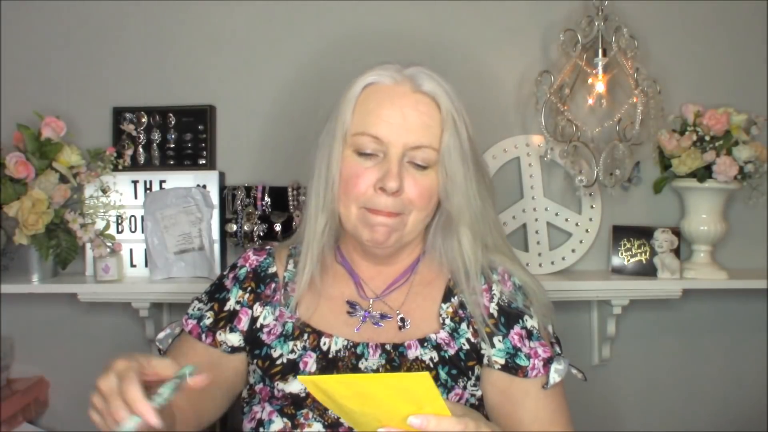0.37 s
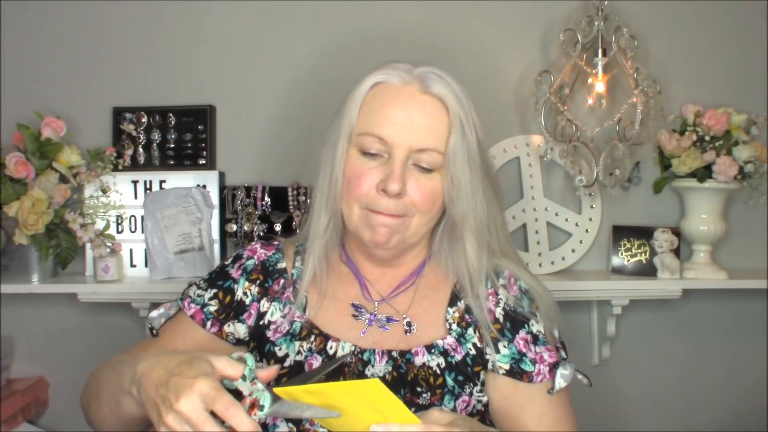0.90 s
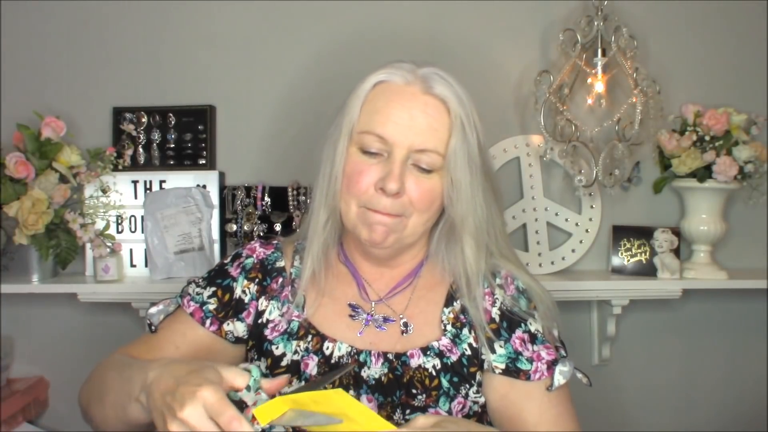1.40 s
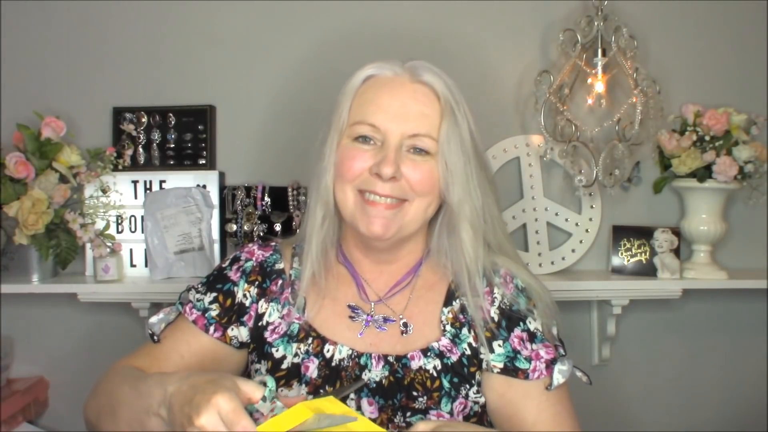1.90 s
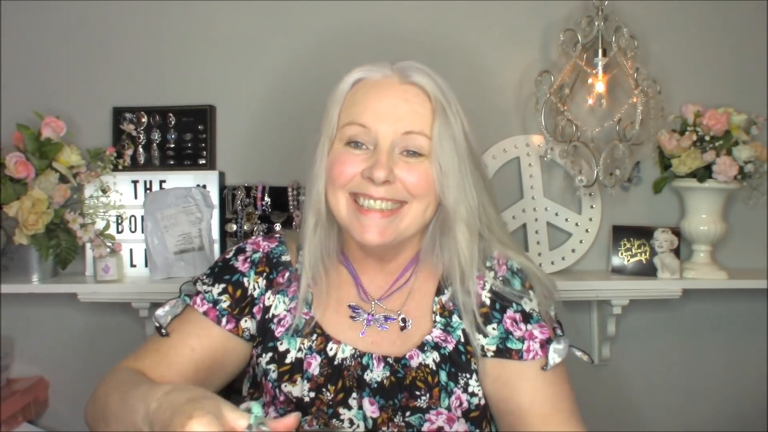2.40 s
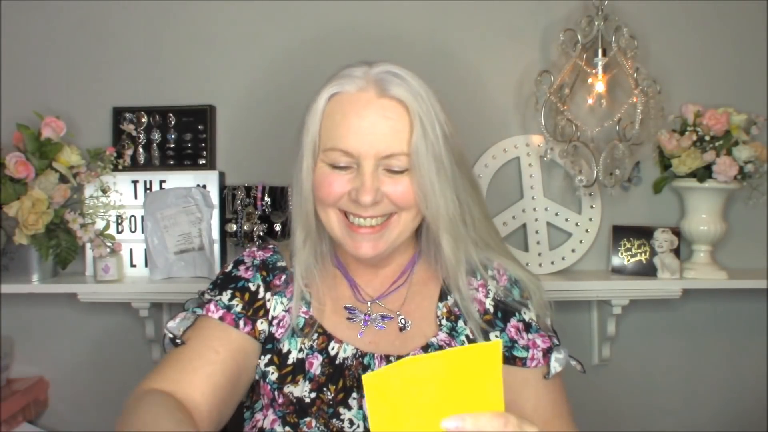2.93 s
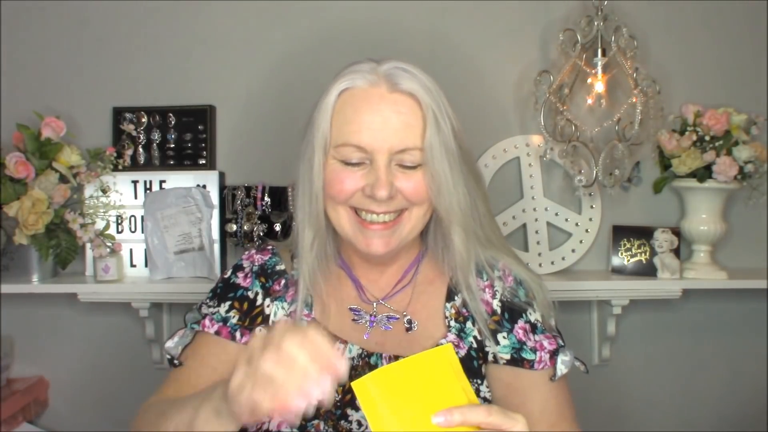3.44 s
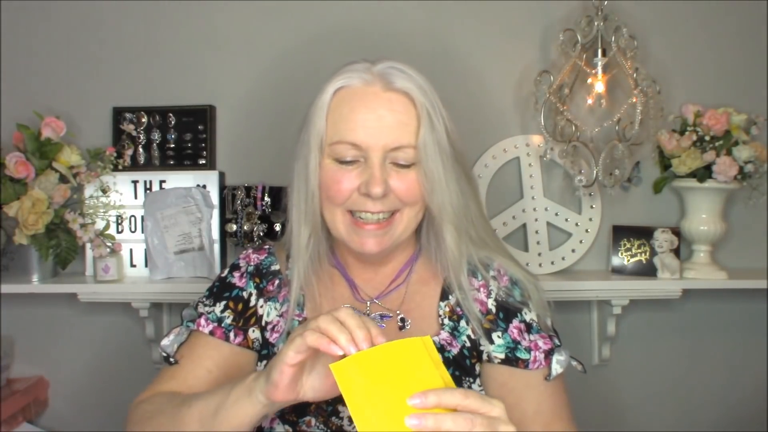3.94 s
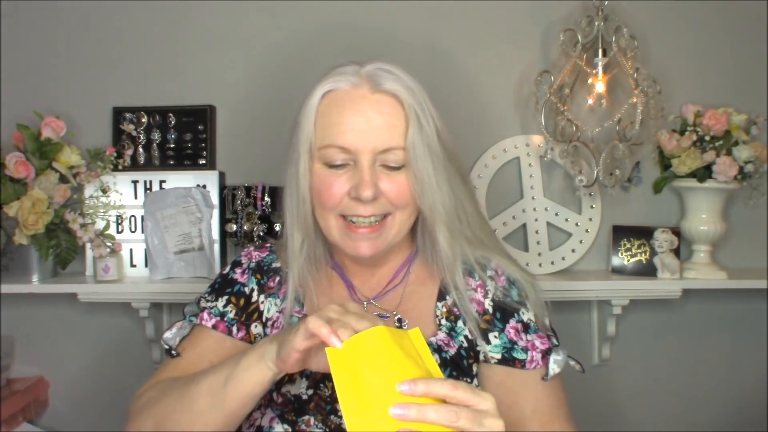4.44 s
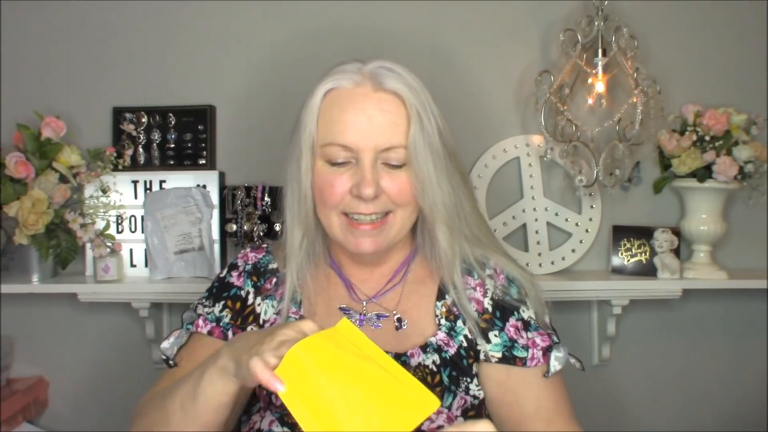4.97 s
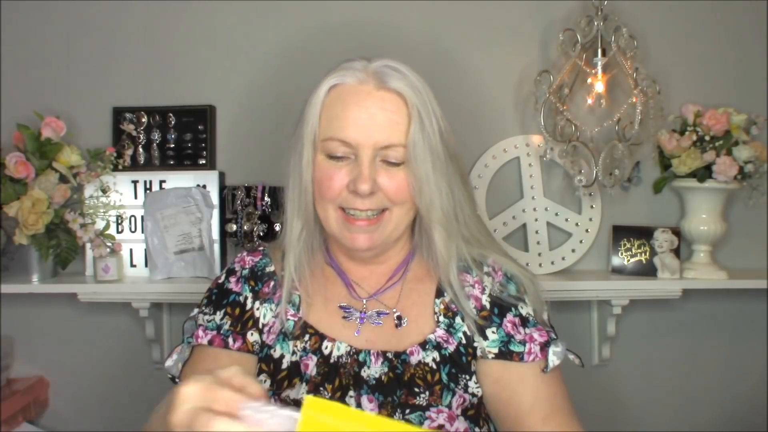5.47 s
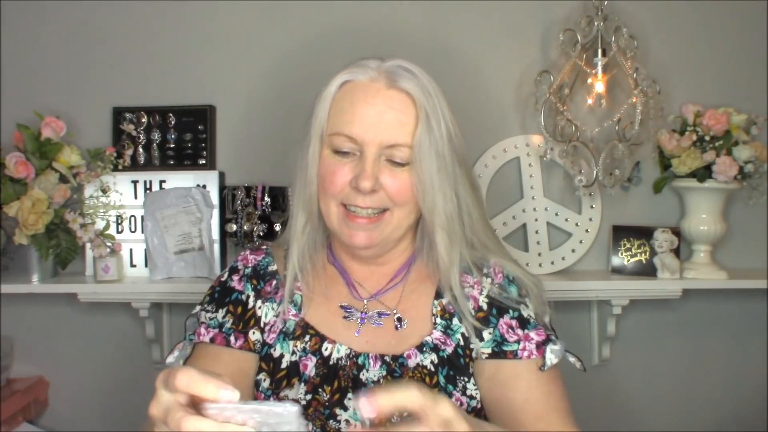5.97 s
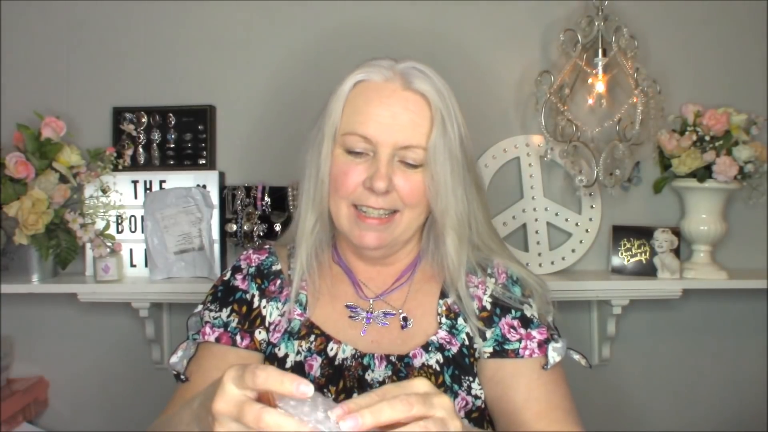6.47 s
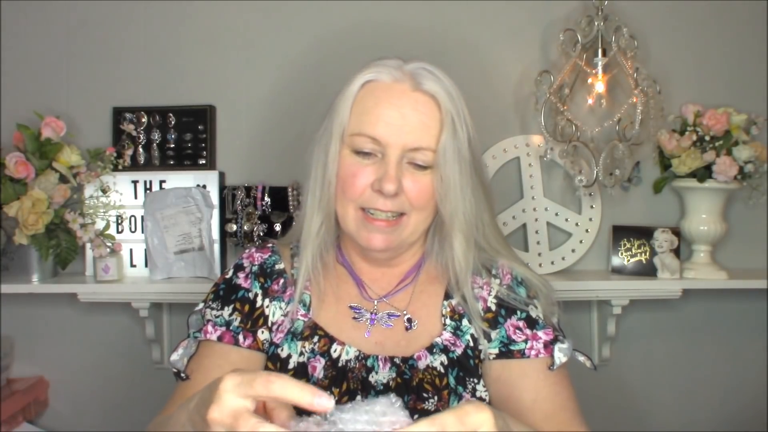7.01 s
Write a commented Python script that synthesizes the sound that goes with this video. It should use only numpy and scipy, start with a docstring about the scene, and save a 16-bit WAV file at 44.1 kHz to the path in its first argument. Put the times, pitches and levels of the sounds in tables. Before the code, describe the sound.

Scissors snip crisply through a padded paper packet, clack down on a table, then fingers rustle paper and draw out crackling plastic wrap.

```python
"""Scissors are picked up, snip four times through a padded paper packet and are laid on a table: grainy
friction and noise-burst blows drive ringing steel. Fingers then open the packet and pull out crinkling
plastic wrap: clumped grains shaped by strokes, with sharp cracks. Soft thuds are decaying low sines.
A small furnished room adds sparse, decaying taps over a low hum of shaped noise; the sound is near-mono."""
import sys
import numpy as np
from scipy import signal
from scipy.io import wavfile
from scipy.ndimage import uniform_filter1d

SR = 44100
rng = np.random.default_rng(int(sys.argv[2]) if len(sys.argv) > 2 else 0)


def gain_from_decibels(decibels):
    """Convert decibel values to linear amplitude factors."""
    exponent = np.asarray(decibels, float) / 20
    return 10 ** exponent


def generate_wav(sig):
    """Save sig (samples, or channels by samples) to the path in sys.argv[1] as 16-bit PCM at SR."""
    pcm = np.round(np.clip(np.atleast_2d(sig).T, -1, 1) * 32767).astype(np.int16)
    wavfile.write(sys.argv[1], SR, pcm)


N = 313992

# Blades sliding and shearing. Each row: peak in s, effort in dB, rise in s, fall in s, brightness in dB per octave.
SHEAR_STROKES = [(0.332, -48.5, 0.0069, 0.043, 7.5), (0.375, -49.5, 0.0013, 0.048, 8.5),
                 (0.595, -50.5, .004, 0.4, 3), (.74, -57.5, 0.29, .08, 0), (.87, -60, 0.032, 0.046, -2),
                 (0.959, -51, 0.0055, 0.15, 1.5), (1.03, -48, .01, 0.25, 3.5),
                 (1.109, -35, 0.0042, 0.077, 2), (1.25, -58.5, 0.11, 0.22, 1.5),
                 (1.365, -41, 0.075, 0.07, 5.5), (1.45, -60.5, 0.0074, .04, 2),
                 (1.515, -33, 0.029, 0.021, 4.5), (1.55, -40.5, 0.026, 0.091, 2.5),
                 (1.594, -44, 0.0064, 0.039, 1.5), (1.674, -54, 0.014, 0.075, 1.5),
                 (1.774, -40.5, 0.015, .1, 4.5), (1.825, -45.5, 0.069, 0.052, 3.5),
                 (1.875, -48, 0.024, 0.13, 2), (1.916, -37.5, 0.011, 0.099, 1.5),
                 (1.98, -49.5, .04, 0.065, 5), (2.164, -39, 0.079, 0.062, 5),
                 (2.246, -33, 0.029, 0.024, 1.5), (2.281, -36.5, 0.025, 0.044, 1)]
# Rustling of packet and wrap, with a soft swell and the scatter as the scissors are laid down.
# Each row: peak in s, effort in dB, rise in s, fall in s, brightness in dB per octave.
RUSTLE_STROKES = [(2.37, -56.5, 0.05, 0.043, 0.5), (2.399, -40, 0.0085, 0.025, 0.5),
                  (2.42, -40, 0.0057, 0.033, -2), (2.531, -47.5, .05, 0.023, 1),
                  (2.575, -52, .015, 0.086, 0), (2.65, -69.5, .05, 0.4, 1.5), (2.9, -59.5, .1, 0.074, 0),
                  (3.0, -57.5, 0.088, .08, -2), (3.144, -48, 0.019, 0.026, 0.5),
                  (3.178, -43, 0.0062, 0.064, -1.5), (3.26, -33.5, .008, 0.031, -3.5),
                  (3.308, -34.5, 0.042, 0.05, -3.5), (3.375, -49.5, .04, 0.038, -3),
                  (3.599, -50, 0.0037, 0.022, -1.5), (3.624, -55, 0.014, 0.061, 1),
                  (3.662, -40, 0.0073, 0.025, -1), (3.718, -43.5, 0.018, 0.021, 0.5),
                  (3.874, -60.5, 0.013, 0.022, 1), (3.94, -58, 0.025, 0.22, 3),
                  (3.988, -41.5, 0.009, 0.019, 4), (4.048, -44.5, 0.014, 0.0069, .5),
                  (4.08, -51, 0.044, 0.22, 1.5), (4.2, -49.5, 0.26, 0.095, 2.5),
                  (4.289, -52.5, .006, 0.74, 1.5), (4.462, -48.5, 0.018, .1, 0),
                  (4.53, -48.5, .05, 0.44, 1.5), (4.744, -52, .01, 0.079, 0.5), (4.89, -45, 0.13, .04, 2.5),
                  (4.95, -56, .05, .05, -1), (5.033, -48.5, 0.013, 0.13, -0.5), (5.138, -49, 0.015, 0.2, 0),
                  (5.28, -52.5, 0.25, .15, -1), (5.459, -37.5, 0.14, 0.13, 0.5),
                  (5.706, -43, 0.056, 0.011, 0.5), (5.757, -44, 0.06, 0.064, -1.5),
                  (5.832, -52.5, 0.0061, 0.11, -4.5), (5.898, -52, 0.083, 0.033, 3.5),
                  (5.984, -56.5, 0.12, 0.135, 2.5), (6.147, -54.5, 0.078, 0.016, 1.5),
                  (6.34, -55.5, 0.44, 0.25, 2), (6.408, -46.5, 0.038, .08, 3),
                  (6.545, -47, 0.093, 0.094, 2), (6.71, -53, 0.28, 0.25, 2),
                  (6.87, -49.5, 0.084, 0.49, 2.5), (7.095, -54, .01, 0.08, 6.5)]
# Blows of the blades. Each row: time in s, level in dB, pitch in Hz, thump in dB re the blow.
SNIP_BLOWS = [(.3313, -32, 5150, -34), (.3793, -39, 6300, -29), (.479, -57.5, 6960, -30),
              (1.036, -32, 2100, -24), (1.0991, -10.5, 4000, -31), (1.1003, -13, 2430, -29),
              (1.281, -39, 2820, -11), (1.3012, -38, 7500, -16), (1.5114, -23.5, 4280, -35),
              (1.5312, -9.5, 4370, -22.5), (1.5425, -24, 4220, -24), (1.5546, -27.5, 4520, -4),
              (1.573, -25.5, 3970, -9), (1.5939, -20.5, 4250, -17), (1.8164, -30.5, 1340, -15),
              (1.9155, -18, 4160, -24), (1.9335, -41, 4210, -5), (1.9602, -20.5, 4220, -35),
              (1.9744, -32, 4490, -19), (1.9881, -34, 3960, -29), (2.15, -35, 4450, -15),
              (2.1648, -24.5, 5400, -10.5), (2.2251, -24, 6430, -9), (2.243, -19, 2110, -21),
              (2.2672, -13, 4160, -10), (2.2736, -11.5, 9300, -13)]
# Scissors meeting the table. Each row: time in s, level in dB, pitch in Hz, thump in dB re the blow.
KNOCK_BLOWS = [(3.123, -45, 447, -26), (3.173, -27.5, 3630, -37), (3.203, -26, 2420, -15.5),
               (3.254, -10.5, 2980, -11), (3.271, -16, 1060, -14), (3.295, -12, 4140, -44),
               (3.302, -19.5, 1090, -48), (3.365, -30, 6190, -22), (3.383, -30.5, 900, -26)]
# Stiff folds cracking. Each row: time in s, level in dB, pitch in Hz, thump in dB re the blow.
CRACK_BLOWS = [(2.394, -27, 678, -26), (2.419, -28.5, 4870, -26), (2.442, -30, 5840, -12),
               (2.485, -34, 3270, -25), (2.52, -23.5, 3920, -22), (2.562, -40, 894, -23),
               (2.5726, -33, 6300, -11), (3.6, -45.5, 960, 3), (3.638, -35, 3060, -23),
               (3.659, -30, 1016, -16), (3.714, -33.5, 960, -2), (3.7913, -47, 3900, -8),
               (3.941, -39, 6100, -20), (3.983, -24.5, 1480, -14), (4.047, -31.5, 3030, -41),
               (4.181, -31, 1340, -3), (4.463, -38.5, 930, 2.5), (4.479, -31.5, 6260, -16),
               (4.743, -40, 2660, -25), (4.892, -29.5, 1280, -20), (4.903, -16, 1810, -15),
               (4.946, -41, 900, 2), (5.035, -36.5, 950, -1.5), (5.079, -34.5, 2080, -33),
               (5.136, -37, 1190, -2), (5.163, -38, 1050, -9), (5.199, -39, 1040, -13),
               (5.247, -28.5, 6800, -34), (5.383, -38, 4200, -1.5), (5.409, -32.5, 1170, -24),
               (5.441, -32.5, 1096, -26), (5.471, -23, 2980, -24), (5.53, -34, 3250, -12),
               (5.652, -29, 7500, -29), (5.696, -27.5, 1510, -3.5), (5.736, -27.5, 3780, -16),
               (5.754, -34.5, 1240, -3), (5.821, -13, 1606, -21.5), (5.8215, -21, 4470, -38),
               (5.988, -32.5, 6000, -30), (6.071, -39, 8000, -30), (6.128, -37, 7000, -30),
               (6.197, -34, 8450, -28), (6.23, -36, 4200, -28), (6.274, -37, 7260, -30),
               (6.296, -41, 7000, -25), (6.308, -29, 6030, -28), (6.326, -34, 7000, -25),
               (6.4035, -19, 6000, -29), (6.425, -25, 4780, -40), (6.454, -33, 6250, -27),
               (6.475, -33, 6380, -34), (6.543, -37, 8100, -23), (6.712, -32, 3020, -16),
               (6.754, -35, 6130, -35), (6.876, -32.5, 3030, -31), (7.093, -27.5, 3060, -21)]
# Soft low bumps on the table. Each row: start in s, level in dB, pitch in Hz, t60 in s.
TABLE_THUDS = [(1.101, -39, 305, 0.066), (1.28, -36, 298, 0.03), (2.147, -33, 343, 0.027),
               (3.119, -42, 145, 0.1), (3.258, -30, 235, 0.056), (3.597, -34, 277, 0.023),
               (5.699, -25.5, 225, 0.039)]

# Resonances of the held blades. Each row: centre in Hz, width in Hz, relative level in dB.
BLADE_MODES = [(1244, 150, 15.5), (2320, 600, -1), (4210, 220, 5.5), (5130, 280, 3.5), (6630, 600, 3),
               (7990, 28, 6), (9830, 760, -3), (11420, 70, -10)]
# Resonances of the scissors lying loose. Each row: centre in Hz, relative level in dB, t60 in s.
STEEL_MODES = [(2080, -10, 0.23), (2600, -14, 0.13), (3000, 0, 0.18), (3130, 15, 0.11), (3670, -18, 0.18),
               (5152, -15, 0.2), (5370, -24, 0.18), (6860, 18, 0.082)]
# Resonances of the wooden top. Each row: centre in Hz, width in Hz, relative level in dB.
TABLE_MODES = [(300, 45, -13), (571, 15, 18), (1050, 29, -9)]
# Resonances of the paper pouch. Each row: centre in Hz, width in Hz, relative level in dB.
SHEET_MODES = [(417, 270, -23), (930, 50, -22), (1610, 470, 9), (2840, 850, 3)]

# Spectrum of blade friction. Each row: frequency in Hz, relative density in dB per Hz.
SHEAR_SPECTRUM = [(88, -13), (150, -6), (354, 15.5), (790, 6), (1240, 5), (1480, 13), (4410, 9), (9000, 3),
                  (13200, -4), (16000, -26.5)]
# Spectrum of paper rustle. Each row: frequency in Hz, relative density in dB per Hz.
PACKET_SPECTRUM = [(88, -55), (150, -18), (422, -2.5), (871, -4.5), (1140, -1.5), (2060, -1), (2270, -2),
                   (4320, -1.5), (11000, -10.5), (14500, -19), (16000, -32)]
# Spectrum of plastic wrap. Each row: frequency in Hz, relative density in dB per Hz.
WRAP_SPECTRUM = [(500, -19), (2500, 3), (6000, 8), (12000, 3.5), (16000, -10)]
# Spectrum of the hum. Each row: frequency in Hz, relative density in dB per Hz.
HUM_SPECTRUM = [(24, -39), (45, -32), (80, -18.5), (112, -1), (194, 0), (256, -4.5), (455, 4), (529, -5),
                (810, -10.5), (1180, -12.5), (1520, -18.5), (2700, -16.5), (2910, -20.5), (7540, -26),
                (13100, -33.5), (16000, -36.5)]
# Faint left-right difference under the hum. Each row: frequency in Hz, side re mid in dB.
HUM_SIDE_LEVEL = [(60, -14), (240, -17.5), (950, -7.5), (3770, -8.5), (15000, -17)]
# Decay of the room. Each row: frequency in Hz, t60 in s.
ROOM_DECAY = [(200, 0.1), (1000, 0.15), (4000, 0.093), (12000, 0.076)]
# Faint left-right difference following the sounds. Each row: frequency in Hz, level in dB re the mid
# tails ahead of ROOM_DB.
SIDE_LEVEL = [(200, -40), (1000, -28), (3000, -24.5), (8000, -18), (15000, -26)]

HUM_RMS_DB = -58.5
WALL_MS, ROOM_DB, LEFT_DB = 6.4, -12, 0.29
WRAP_OUT_S = 5.6
EDGE_DB, BEND = 20, 1.3  # a stroke is EDGE_DB down one rise before and one fall after its rounded peak
SNIP_DECAY_MS, KNOCK_DECAY_MS, CRACK_DECAY_MS = 1.3, 0.84, 0.55
SNIP_SIZZLE_DB, KNOCK_SIZZLE_DB, CRACK_SIZZLE_DB = -6, -18, -13  # for a blow of MIDDLING_DB
MIDDLING_DB = -28
DULLING = 0.4  # dB of sizzle lost per dB of strength: harder blows put more into their own pitch


def evened(x):
    """Scales to rms 1."""
    return x / np.sqrt(np.mean(x ** 2) + 1e-20)


def peak_one(x):
    """Scales to peak 1."""
    return x / abs(x).max()


def read(points, hz):
    """Interpolates a table on a log-frequency axis."""
    f, value = np.transpose(points)
    return np.interp(np.log(hz + 1), np.log(f + 1), value)


def add(mix, start_s, sound):
    """Mixes a sound in place at start_s."""
    part = mix[round(start_s * SR):][:len(sound)]
    part += sound[:len(part)]


def band(x, lo_hz, hi_hz):
    """Causal band-pass."""
    edges_hz = np.clip([lo_hz, hi_hz], 30, SR / 2 - 900)
    return signal.sosfilt(signal.butter(2, edges_hz, "band", fs=SR, output="sos"), x)


def ring(modes, size):
    """Impulse response of (Hz, width in Hz, dB) resonances: decaying sines, total energy 1."""
    t = np.arange(size) / SR
    y = sum(gain_from_decibels(db) * width_hz * np.exp(-np.pi * width_hz * t) * np.sin(2 * np.pi * hz * t)
            for hz, width_hz, db in modes)
    return y / np.linalg.norm(y)


def grains(per_s, spread_db, hiss, clump_db):
    """Tiny breaks of fibre, unequal in size and pitch, in clumps, over a share of smooth hiss."""
    size = gain_from_decibels(spread_db * np.minimum(rng.exponential(1, N), 3.5))
    size *= rng.random(N) < per_s / SR
    kind = rng.integers(0, 24, N)
    shapes = rng.standard_normal((24, 60)) * np.exp(-np.arange(60) / 14)
    ticks = evened(sum(signal.oaconvolve(size * (kind == k), shape)[:N] for k, shape in enumerate(shapes)))
    clumps = evened(uniform_filter1d(uniform_filter1d(rng.standard_normal(N), 200), 200))
    return evened((ticks + hiss * rng.standard_normal(N)) * gain_from_decibels(clump_db * clumps))


def stroke(drive, spectrum, rows, patchy_db):
    """Sums strokes into one effort that colours and tilts the drive; random narrow patches swell and fade."""
    hz, frame_s, z = signal.stft(drive, SR, nperseg=256, noverlap=192)
    time_s = np.arange(0, N + 256, 16) / SR
    peak_s, effort_db, rise_s, fall_s, bright_db = np.transpose(rows)[:, :, None]
    away = np.where(time_s < peak_s, (peak_s - time_s) / abs(rise_s), (time_s - peak_s) / abs(fall_s))
    power = gain_from_decibels(2 * np.maximum(effort_db - EDGE_DB * away ** BEND, -200))

    # The strongest stroke rules the tilt, which pivots at 4 kHz and stays flat below 800 Hz.
    tilt_db = np.interp(frame_s, time_s, (power * bright_db).sum(0) / power.sum(0))
    octaves = np.log2(np.maximum(hz[:, None], 800) / 4000)
    shape = gain_from_decibels(read(spectrum, hz)[:, None] + octaves * tilt_db)

    # Like shifting resonances.
    patches = rng.standard_normal(shape.T.shape)
    patches = uniform_filter1d(uniform_filter1d(patches, 30, 0), 2, 1).T
    shape *= gain_from_decibels(patchy_db * evened(uniform_filter1d(patches, 30, 1)))
    reference = shape[(hz > 2000) & (hz < 8000)]
    shape /= np.sqrt(np.mean(reference ** 2) * 6000 / (SR / 2))
    y = signal.istft(z * shape, SR, nperseg=256, noverlap=192)[1][:N]
    return y * np.interp(np.arange(N) / SR, time_s, np.sqrt(power.sum(0)))


def blows(rows, decay_ms, sizzle_db, body, body_db, sharp, spread, note_db, flutter_db, cycles):
    """Noise bursts, each about its own pitch, with thump, sizzle, flutter and the ring of the body."""
    out, t = np.zeros(N), np.arange(2000) / SR
    noise = rng.standard_normal((len(rows), len(t)))
    u = t / (decay_ms / 1000)
    for (s, db, hz, thump_db), n in zip(rows, noise):
        burst = n * u ** sharp * np.exp(-u)
        broad = peak_one(band(burst, hz / spread, hz * spread))

        few_cycles = np.exp(-t * hz / cycles) * np.cos(2 * np.pi * hz * t)
        note = signal.fftconvolve(band(burst, hz / 1.2, hz * 1.2), few_cycles)[:len(t)]
        sizzle = peak_one(band(burst, 3300, 15000))
        thump = peak_one(band(band(burst, 260, 1300), 220, 900))
        # Loose parts settle.
        flutter = peak_one(band(n[::-1] * t * np.exp(-t / 0.0047), hz / 1.8, hz * 1.37))

        tick = peak_one(broad + gain_from_decibels(note_db) * peak_one(note))
        tick += gain_from_decibels(sizzle_db - DULLING * (db - MIDDLING_DB)) * sizzle
        tick += gain_from_decibels(thump_db) * thump + gain_from_decibels(flutter_db) * flutter
        # The body answers mostly near the pitch of the blow.
        rung = gain_from_decibels(body_db) * signal.fftconvolve(tick, body) + np.pad(tick, (0, len(body) - 1))
        add(out, s - 0.5 * sharp * decay_ms / 1000, gain_from_decibels(db) * rung)  # a swelling burst starts early
    return out


def hum():
    """Steady, slightly patchy noise shaped in frequency, mostly alike in both channels."""
    frames, hz = N // 512 + 5, np.fft.rfftfreq(2048, 1 / SR)
    a, b, c, d, patches = rng.standard_normal((frames, 1025, 5)).T
    patches = evened(uniform_filter1d(uniform_filter1d(patches, 8, 0), 6, 1))
    mid = a + 1j * b
    side = gain_from_decibels(read(HUM_SIDE_LEVEL, hz))[:, None] * (c + 1j * d)
    z = np.array([mid + side, mid - side]) * gain_from_decibels(read(HUM_SPECTRUM, hz)[:, None] + 2.04 * patches)
    return gain_from_decibels(HUM_RMS_DB) * evened(signal.istft(z, nperseg=2048, noverlap=1536)[1][:, :N])


def room(x):
    """Sparse taps from the first wall on, each band dying at its own speed; a faint left-right difference
    follows the sounds."""
    slots = np.arange(0, SR // 2, 20)
    taps = np.zeros((6, SR // 2 + 20))  # three mid sets, three side sets
    at = slots + rng.integers(0, 20, (6, len(slots)))
    np.put_along_axis(taps, at, rng.choice([-1., 1.], at.shape), 1)
    hz, t, z = signal.stft(taps, SR, nperseg=128)
    z[3:] *= gain_from_decibels(read(SIDE_LEVEL, hz))[:, None]
    decay = gain_from_decibels(-60 * t / read(ROOM_DECAY, hz)[:, None])
    tail = signal.istft(z * decay, SR, nperseg=128)[1]
    tail = np.pad(tail, ((0, 0), (round(WALL_MS * SR / 1000), 0))) / np.linalg.norm(tail[0])

    # Three tap sets take turns at 7 Hz, so that steady noise gets no fixed colouring.
    turn = 2 * np.pi * (7 * np.arange(N) / SR + np.arange(3)[:, None] / 3)
    fed = np.tile(x * np.cos(turn) * np.sqrt(2 / 3), (2, 1))
    wet = signal.fftconvolve(fed, tail, axes=1)[:, :N]
    mid, side = x + gain_from_decibels(ROOM_DB) * wet[:3].sum(0), wet[3:].sum(0)
    return np.array([mid + side, mid - side])


def thuds():
    """A hand or handle meets the table: a few low cycles with a soft onset."""
    out, t = np.zeros(N), np.arange(8000) / SR
    onset = 1 - np.exp(-(t / 0.0019) ** 2)
    for s, db, hz, t60_s in TABLE_THUDS:
        add(out, s, gain_from_decibels(db - 60 * t / t60_s) * onset * np.sin(2 * np.pi * hz * t))
    return out


def packet():
    """Paper and wrap rustle in grains and crinkles; wrap once out adds sparse ticks; stiff folds crack."""
    wrap_out = [row for row in RUSTLE_STROKES if row[0] > WRAP_OUT_S]
    rustle_grains = grains(per_s=2000, spread_db=4.7, hiss=0.91, clump_db=2.15)
    crinkle_grains = grains(per_s=260, spread_db=3.2, hiss=0, clump_db=2.5)
    sparse_grains = grains(per_s=70, spread_db=3.3, hiss=0, clump_db=0)
    rustle = stroke(rustle_grains, PACKET_SPECTRUM, RUSTLE_STROKES, patchy_db=2.5)
    crinkle = stroke(crinkle_grains, WRAP_SPECTRUM, RUSTLE_STROKES, patchy_db=3)
    sparse = stroke(sparse_grains, WRAP_SPECTRUM, wrap_out, patchy_db=3)
    cracks = blows(CRACK_BLOWS, CRACK_DECAY_MS, CRACK_SIZZLE_DB, ring(SHEET_MODES, size=2000), body_db=-19,
                   sharp=0.12, spread=2.24, note_db=-4.5, flutter_db=-14.5, cycles=1.3)
    return rustle + gain_from_decibels(-8.5) * crinkle + gain_from_decibels(-8) * sparse + cracks


def scissors():
    """Friction and snips excite the held blades; laid down, steel and table ring longer."""
    blades = ring(BLADE_MODES, size=1200)
    rub = grains(per_s=6000, spread_db=1.0, hiss=1.4, clump_db=1.5)
    rub = evened(rub + 0.43 * signal.oaconvolve(rub, blades)[:N])
    shear = stroke(rub, SHEAR_SPECTRUM, SHEAR_STROKES, patchy_db=3.0)
    snips = blows(SNIP_BLOWS, SNIP_DECAY_MS, SNIP_SIZZLE_DB, blades, body_db=-19.0,
                  sharp=1.0, spread=2.03, note_db=-7.5, flutter_db=-16.5, cycles=2.8)

    # t60 becomes a width; the dB term cancels the width weighting in ring().
    steel = ring([(hz, 3.6 / t60_s, db + 20 * np.log10(t60_s)) for hz, db, t60_s in STEEL_MODES], size=9000)
    body = steel + 0.69 * ring(TABLE_MODES, size=9000)
    laid = blows(KNOCK_BLOWS, KNOCK_DECAY_MS, KNOCK_SIZZLE_DB, body, body_db=-15.5,
                 sharp=0.21, spread=2.02, note_db=-13.0, flutter_db=-17.0, cycles=1.5)
    return shear + snips + laid


def scene():
    """The sources share the room, over the hum."""
    return room(scissors() + packet() + thuds()) + hum()


def top_cut(x):
    """Nothing passes above the cut-off."""
    return signal.sosfilt(signal.butter(12, 16690, fs=SR, output="sos"), x)


def record(dry):
    """A high-pass drops the deep bass, the left is slightly louder, and a low-pass drops the top treble."""
    thin = signal.sosfilt(signal.butter(1, 35, "high", fs=SR, output="sos"), dry)
    thin = thin * gain_from_decibels([[LEFT_DB], [0]])
    mix = signal.oaconvolve(thin, signal.firwin(255, 16500, fs=SR)[None], "same")
    return top_cut(mix)


dry = scene()
out = record(dry)
generate_wav(out)
```